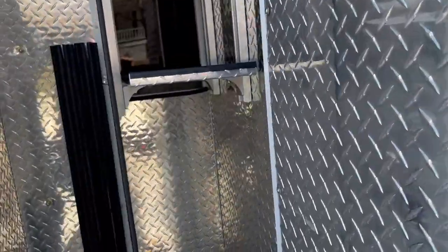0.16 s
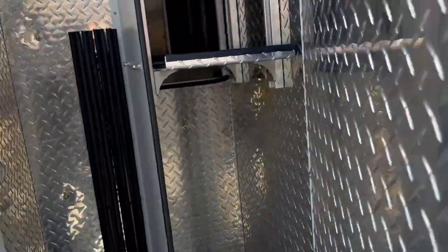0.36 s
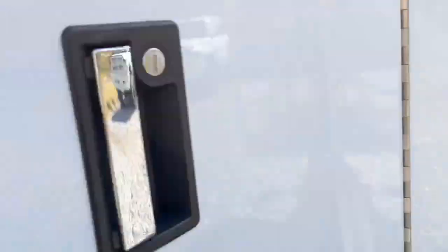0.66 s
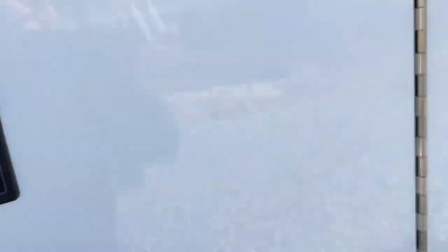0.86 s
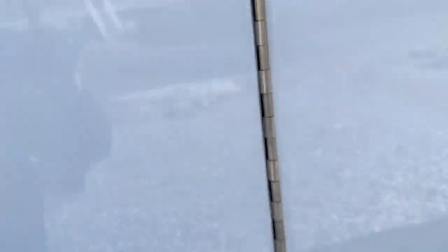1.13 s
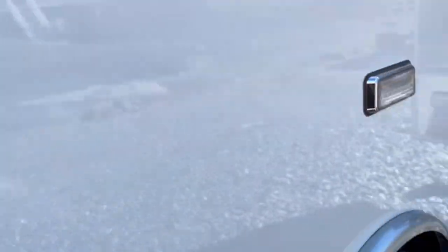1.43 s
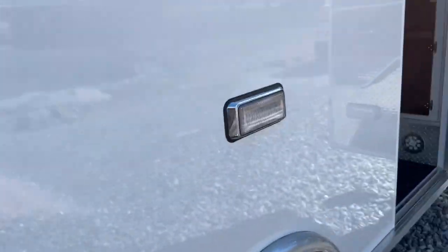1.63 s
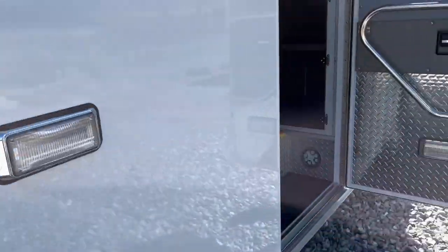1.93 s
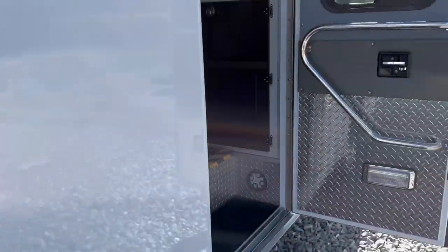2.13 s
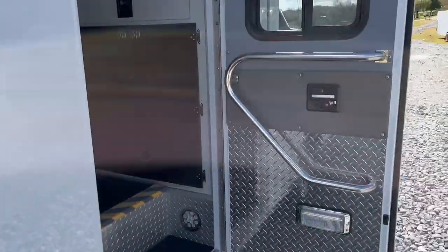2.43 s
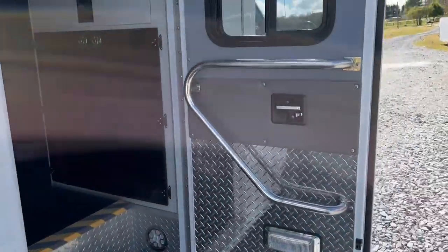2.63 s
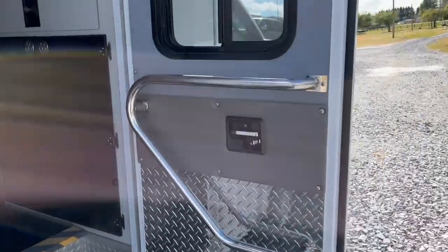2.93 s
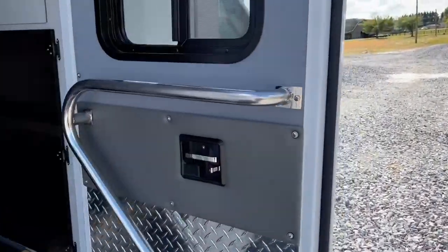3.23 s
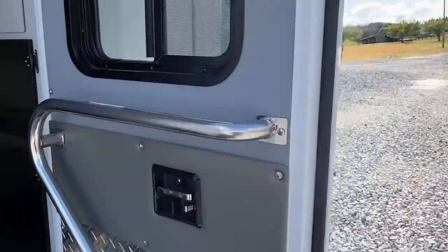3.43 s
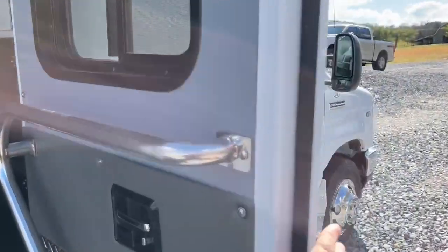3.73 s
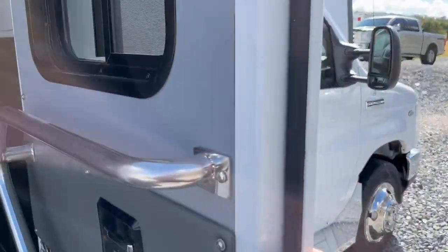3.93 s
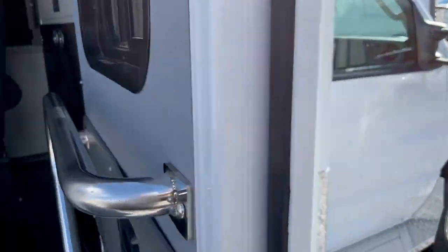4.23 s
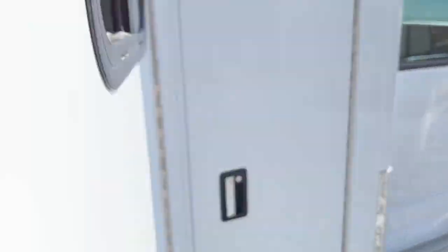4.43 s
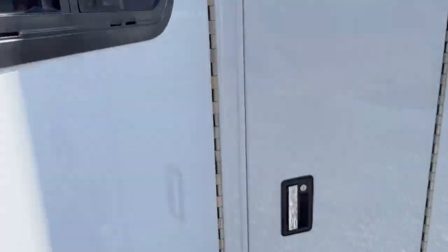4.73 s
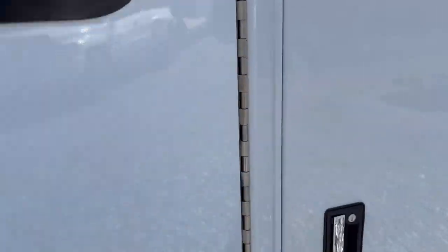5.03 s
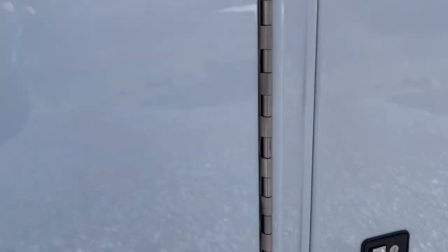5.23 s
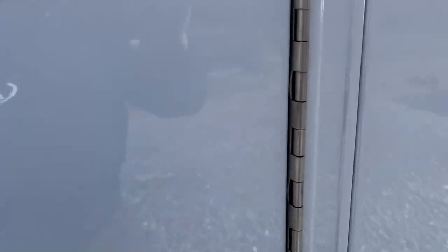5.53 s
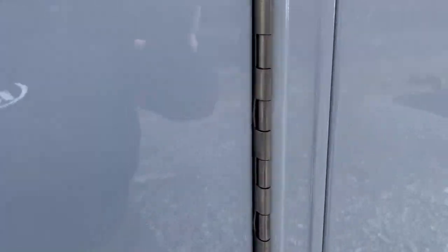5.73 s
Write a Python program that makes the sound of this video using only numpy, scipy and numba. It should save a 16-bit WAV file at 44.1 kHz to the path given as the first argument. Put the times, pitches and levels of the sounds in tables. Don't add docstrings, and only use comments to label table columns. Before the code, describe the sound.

Close stereo phone pickup in open air, with a quiet hush of far traffic. Light gravel scuffs lead to a seal creak and a loud, deep metal door slam just before one second. Uneven footsteps grind and crack pebbles, hardest near two seconds. After a quieter walk, latch parts tick and rattle, then another panel door slams, its low boom dying quickly.

```python
import sys
import numpy as np
from scipy import signal
from scipy.fft import rfft, irfft, next_fast_len
from scipy.io import wavfile
from scipy.ndimage import uniform_filter1d
from numba import njit

SR = 44100
rng = np.random.default_rng(int(sys.argv[2]) if len(sys.argv) > 2 else 0)


def level_to_linear(level):
    exponent = np.asarray(level, float) / 20
    return 10 ** exponent


def store_pcm(level_fs):
    pcm = np.round(np.clip(level_fs, -1, 1) * 32767).astype(np.int16)
    wavfile.write(sys.argv[1], SR, np.atleast_2d(pcm).T)


N = 258426

# frequency_hz, density_db (per Hz)
STONES = [(120, -11.5), (200, -3.5), (617, -3), (934, -0.5), (2170, -4.5), (3950, -3.5), (5980, -4.5),
          (8050, -0.5), (10500, -7.5), (13000, -27), (15700, -31.5), (16200, -73)]


def unit(x):
    return x / np.sqrt(np.mean(x ** 2))


def gain_of_table(table, size):
    hz, db = np.transpose(table)
    return level_to_linear(np.interp(np.log(np.fft.rfftfreq(size, 1 / SR) + 1), np.log(hz + 1), db))


def colour(x, table):
    size = next_fast_len(len(x))
    return irfft(rfft(x, size) * gain_of_table(table, size), size)[:len(x)]


def band(x, lo_hz, hi_hz):
    return signal.sosfilt(signal.butter(2, [lo_hz, min(hi_hz, .45 * SR)], "band", fs=SR, output="sos"), x)


@njit
def svf(x, hz, share):
    y, b, l = np.empty(len(x)), 0., 0.
    for i in range(len(x)):
        g = np.tan(np.pi * hz[i] / SR)
        v = (b + g * (x[i] - l)) / (1 + g * (g + share))
        b, l, y[i] = 2 * v - b, l + 2 * g * v, share * v
    return y


def decay(t, t60):
    return np.exp(-t * np.log(1000) / t60)


def pressed(table, attack_s):
    s, hold, db, t60 = np.transpose(table)[:4, :, None]
    t = np.arange(N * 1000 // SR + 2) / 1000 - s
    return db + 40 * np.minimum(t / attack_s, 0) - 60 * np.maximum(t - hold, 0) / t60


def total(db):
    gain = np.sqrt(np.sum(level_to_linear(db) ** 2, axis=0))
    return np.interp(np.arange(N) * 1000 / SR, np.arange(db.shape[1]), gain)


def slips(per_s, spread_db, fade_s):
    chance = rng.random((2, N))
    size_db = np.minimum(-spread_db * np.log(chance[1] + 1e-9), 14)
    sizes = (chance[0] < per_s / SR) * level_to_linear(size_db)
    return unit(signal.lfilter([1], [1, -np.exp(-1 / (fade_s * SR))], sizes) + .02)


def bits(table, attack_s):
    out, t = np.zeros((2, N + 8192)), np.arange(8192) / SR
    for s, db, hz, share, t60 in table:
        edge = 1 + np.clip(share, .05, 1.5)
        ring = rng.standard_normal((2, len(t)))
        for _ in range(2):
            ring = band(ring, hz / edge, hz * edge)
        fade = (1 - np.exp(-t / attack_s)) * decay(t, np.clip(t60, .006, .2))
        i = int(s * SR) - 10
        out[:, i:i + len(t)] += level_to_linear(db - 1.5) * fade * unit(ring)
    return out[:, :N]


def ticks(rows, broad, rise_s, dull_top_hz):
    out, t = np.zeros((2, N + 4096)), np.arange(4096) / SR
    for s, db, hz, dull_db, t60 in rows:
        noise = rng.standard_normal((3, len(t)))
        wide = broad(noise[:2], hz)
        ring = unit(band(band(noise[:2], .62 * hz, 1.6 * hz), .62 * hz, 1.6 * hz))
        knock = unit(band(noise[1:], 280, dull_top_hz)) * level_to_linear(dull_db)
        fade = (1 - np.exp(-t / rise_s)) * decay(t, np.clip(t60, .008, .15))
        fade = fade * unit(level_to_linear(3. * unit(band(noise[2], 100, 500))))
        i = int(s * SR) - 20
        out[:, i:i + len(t)] += level_to_linear(db - 6.5) * fade * (1.316 * wide + 1.195 * ring + knock)
    return out[:, :N]


def gravel():
    # start_s, hold_s, level_db, release_t60_s, darkness_db
    steps = [(0., 0.0051, -47, 0.085, 5), (0.078, 0.036, -61.5, 0.88, 13), (.225, 0.041, -42, 0.15, 2),
             (0.28, 0.11, -52, 0.75, 6), (0.5, 0.23, -62.5, 0.32, 9.5), (0.664, 0.2, -56, 0.41, 4),
             (1.271, 0.043, -42.5, 0.26, 3.5), (1.367, 0.061, -44, 0.077, -0.5),
             (1.468, 0.0095, -38.5, 0.37, -6.5), (1.593, 0.29, -67, .3, 8), (1.805, 0.053, -56, 0.22, 7.5),
             (2.136, 0.059, -59, 0.34, 0.5), (2.18, 0.068, -56.5, 0.13, 5),
             (2.265, 0.088, -64.5, 0.54, 10.5), (2.491, 0.019, -46.5, 0.26, 5),
             (2.533, 0.053, -37.5, 0.32, -3.5), (3.295, 0.28, -72.5, .4, 1), (4.597, 0.05, -69.5, .3, 8.5),
             (3.65, 0.0063, -33, 0.11, -6.5), (3.663, 0.036, -42.5, 0.27, 1.5),
             (3.731, 0.042, -41.5, 0.071, -1.5), (3.797, 0.039, -45.5, 0.42, -0.5),
             (3.999, 0.032, -39, 0.27, 0), (4.02, 0.045, -49.5, 0.18, 10), (4.083, 0.18, -58, 0.99, 4),
             (4.345, 0.08, -58, 1, 4.5), (5.096, 0.46, -56, 0.24, 5), (5.593, 0.22, -72, 0.29, 17.5)]
    # start_s, hold_s, level_db, release_t60_s, darkness_db
    stomps = [
        (1.84, 0.087, -31, 0.44, -4),
        (1.97, 0.055, -28, 0.18, -1.5),
        (3.036, 0.068, -37.5, 0.39, 0.5),
    ]
    # start_s, hold_s, level_db, release_t60_s, darkness_db
    rattles = [
        (0.802, 0.086, -47.5, 0.26, 9.5),
        (0.874, 0.094, -34.5, 0.059, 5.5),
        (0.915, 0.033, -50.5, 0.57, 15),
        (4.692, .01, -51, .2, 7),
        (4.711, 0.024, -32, 0.31, -5),
        (4.847, 0.025, -43.5, 0.53, 0),
        (4.986, 0.041, -46, 0.2, 0.5),
        (5.401, 0.016, -37.5, 0.108, 0.5),
        (5.418, 0.0072, -23.5, 0.13, 2.5),
        (5.451, 0.027, -38, 0.24, 12),
    ]
    # time_s, gain_db
    facing = [
        (0., 3),
        (1.5, 3),
        (2.202, 0),
        (3.2, -8.5),
        (3.9, -6.5),
        (4.3, -3),
        (5.86, 6.5),
    ]
    weight_db = np.vstack([pressed(steps, attack_s=0.028), pressed(stomps + rattles, attack_s=0.00234)])
    skin_db = np.repeat([0, 1], [len(steps + stomps), len(rattles)])[:, None]
    facing_db = np.interp(np.arange(weight_db.shape[1]) / 1000, *np.transpose(facing))
    dark = np.array(steps + stomps + rattles)[:, -1:]
    thud_db = -1 + skin_db + 1.48 * dark
    dull_db = 2 + 0.79 * dark
    bright_db = -7 + facing_db
    stone_colour = [(80, -20.5), (140, -3.5)] + STONES[1:]
    grit = np.array([colour(v, stone_colour) for v in rng.standard_normal((2, N))])
    common = slips(450., spread_db=-1.0, fade_s=0.0074)
    out = 0
    # low_hz, high_hz, level_db, slip_fade_s
    for lo, hi, db, fade_s in [(111.5, 641, thud_db, 0.011), (480, 2030, dull_db, 0.0018),
                               (1500, 4290, 0.39, 0.00021), (7000, 24000, bright_db, 0.00013)]:
        rain = 0.14 + common + 0.56 * slips(700., 4.2, fade_s)
        out = out + total(weight_db + db) * unit(band(grit, lo, hi) * rain)
    return out


def air():
    # frequency_hz, density_db
    hush_colour = [(25, -2.5), (53, 5.5), (80, 7.5), (179, -7), (506, -21), (1620, -23), (2030, -30.5),
                   (3730, -28.5), (6500, -37.5), (7750, -38.5), (10500, -38), (13000, -62), (15700, -52.5),
                   (16200, -92)]
    k = int(SR / 4.)
    swell = uniform_filter1d(np.repeat(rng.standard_normal((2, N // k + 1)), k, axis=1), k)[:, :N]
    hush = level_to_linear(-49) * unit(np.array([colour(v, hush_colour) for v in rng.standard_normal((2, N))]))
    return band(hush, 45, 2500) * level_to_linear(2. * swell[0]) + band(hush, 500, 19000) * level_to_linear(2.5 * swell[1])


def stone_ticks():
    # start_s, peak_db, ring_hz, t60_s
    snaps = [(.2365, -29, 4700, 0.096), (.7068, -38, 3500, 0.094), (1.2005, -20, 1640, 0.011),
             (1.273, -29.5, 4230, 0.1), (1.4521, -24, 8200, 0.022), (1.482, -15, 5260, 0.037),
             (1.5703, -40.5, 3200, 0.066), (1.619, -31.5, 3930, 0.017), (1.6553, -41.5, 4070, 0.027),
             (1.8425, -10.5, 3730, 0.022), (1.8606, -18, 4070, 0.16), (1.922, -3, 4400, 0.022),
             (2.1056, -26.5, 6800, 0.025), (2.2946, -27, 1670, 0.029), (2.343, -27, 2590, 0.044),
             (3.041, -17.5, 3710, 0.054), (3.1153, -18.5, 3100, 0.022), (3.2374, -33.5, 2500, 0.031),
             (3.3468, -51.5, 3800, 0.039), (3.7535, -30, 4200, 0.025), (3.9916, -22, 2850, 0.017),
             (4.0094, -23, 2770, 0.054), (4.3303, -32.5, 2770, 0.014), (4.3893, -38.5, 4060, 0.09),
             (4.566, -31.5, 2540, 0.02), (5.1265, -25.5, 1560, 0.056), (5.2105, -28, 2020, 0.019),
             (5.2516, -33, 1650, 0.018)]
    # start_s, peak_db, ring_hz, t60_s
    knocks = [(.1132, -45, 3630, 0.043), (.1447, -32, 1500, 0.073), (.2284, -54, 4350, 0.025),
              (.6885, -39.5, 1900, 0.064), (1.364, -29.5, 2230, 0.029), (1.4022, -33.5, 7660, 0.052),
              (1.7318, -42.5, 2720, 0.063), (1.9719, -36, 4400, 0.2), (2.2317, -41.5, 2800, 0.084),
              (2.4393, -41.5, 1660, 0.12), (2.4909, -39, 3660, 0.023), (2.531, -33, 3200, 0.067),
              (2.5407, -23.5, 2670, 0.043), (2.5815, -28, 2720, 0.085), (3.032, -20.5, 2360, 0.018),
              (3.2012, -40, 3930, 0.023), (3.2974, -35.5, 1500, 0.037), (3.6387, -19.5, 2670, 0.0086),
              (4.4478, -44.5, 2700, 0.14), (5.181, -23.5, 1630, 0.024), (5.3648, -33, 3330, 0.035),
              (5.563, -34, 2090, 0.021), (5.6467, -44.5, 1930, 0.036), (5.7578, -44, 1570, 0.051)]

    def broad(noise, hz):
        wide = np.array([unit(band(colour(v, STONES), 860, 28.0 * hz)) for v in noise])
        return unit(band(band(wide, 300, 3.3 * hz), 1200, 2.39 * hz))

    rows = [(s, db, hz, dull_db, t60) for table, dull_db in ((snaps, -12), (knocks, 5))
            for s, db, hz, t60 in table]
    return ticks(rows, broad, rise_s=.0025, dull_top_hz=1200)


def boom():
    # start_s, hold_s, level_db, release_t60_s, centre_hz
    thumps = [(0.121, 0.037, -27.5, 0.98, 56.8), (0.654, 0.25, -40, 0.28, 65.5),
              (0.906, 0.065, -10, .3, 59.7), (0.99, 0.15, -18.5, 0.34, 67.2),
              (1.251, 0.026, -27.5, 0.16, 60.5), (1.334, 0.0092, -23.5, 0.13, 63),
              (1.475, 0.014, -24, 0.24, 54), (1.707, 0.032, -40, 0.64, 60.5),
              (1.86, 0.045, -33.5, 0.2, 68.8), (1.931, 0.0086, -26, 0.1, 69), (2.085, 0.013, -40, .8, 70),
              (2.409, 0.22, -41, 0.36, 60.2), (2.574, 0.018, -39.5, 0.27, 72.5),
              (3.083, 0.15, -64, 0.78, 68.7), (3.253, 0.11, -47, 0.4, 74),
              (4.003, 0.078, -38.5, 0.37, 67.7), (4.151, 0.02, -41.5, 0.79, 73.2),
              (4.35, 0.28, -52.5, .4, 59.7), (4.674, 0.034, -33.5, 0.76, 55.7),
              (4.819, 0.032, -36.5, 0.83, 65.6), (4.936, 0.088, -29, 0.25, 68), (5.11, 0.019, -36, 1, 51.7),
              (5.264, 0.025, -34.5, 0.77, 56.7), (5.447, 0.018, -14.5, 0.33, 73),
              (5.584, 0.052, -21.5, 0.44, 66.7), (5.681, 0.022, -21.5, 0.2, 81),
              (5.745, 0.17, -27.5, .9, 61)]
    level_db = np.maximum(pressed(thumps, attack_s=0.0072), -200)
    level = total(level_db)
    centre_db = 20 * np.log10(np.array(thumps)[:, -1:])
    hz = np.clip(total(level_db + centre_db) / level, 40, 100)
    shake = rng.standard_normal((2, N))
    ring = svf(svf(shake[0], hz, .15), hz, .35)
    ring = unit(ring / np.sqrt(uniform_filter1d(ring ** 2, 4000) + 1e-9))
    broad = unit(band(shake[1], 40.0, 125))
    rest = level_to_linear(-71)
    return (level + rest) * unit(ring + broad / 1.65)


def creaks():
    # start_s, peak_db, centre_hz, width_share, t60_s
    hollow = [(.146, -32, 1710, 0.31, 0.045), (.802, -29, 686, 0.11, 0.084), (.826, -22.5, 360, 0.21, 0.16),
              (.83, -26, 637, .15, 0.044), (.85, -19.5, 400, 0.24, 0.061), (.868, -18, 480, 0.18, .05),
              (4.02, -35, 513, 0.72, 0.14), (4.866, -31, 543, 0.4, 0.033), (5.445, -14.5, 282, 0.46, 0.24),
              (5.495, -10, 300, 0.52, 0.035), (5.604, -37.5, 2010, 0.11, 0.035)]
    return bits(hollow, attack_s=0.0023)


def pebbles():
    # start_s, peak_db, centre_hz, width_share, t60_s
    rolling = [(.175, -49, 4500, .3, .02), (.51, -48, 4500, 0.48, .03), (.78, -44, 3700, 0.52, 0.094),
               (1.292, -26, 5960, 0.79, 0.018), (1.385, -34, 890, 0.34, 0.18),
               (1.42, -32, 4500, 0.68, 0.022), (1.695, -48, 4570, 0.15, 0.018),
               (1.773, -47, 1500, 0.98, 0.026), (2.177, -51, 3290, .4, .04),
               (2.199, -42, 2690, 0.32, 0.037), (2.302, -34.5, 2370, 0.37, 0.023),
               (2.42, -45.5, 2000, .7, 0.037), (3.051, -18, 3750, 0.23, 0.022),
               (3.1694, -41, 1780, 0.86, 0.026), (3.3196, -43, 2020, 0.84, 0.074),
               (3.6415, -26, 3480, 0.98, 0.04), (3.665, -32.5, 4500, 1, .03),
               (3.676, -28, 3280, 0.45, 0.028), (3.693, -31, 1500, 0.8, .02), (3.768, -45, 5000, .9, 0.014),
               (4.46, -39, 3440, 0.53, 0.032), (4.488, -42, 1970, 1, 0.048),
               (4.503, -47, 2490, 0.69, 0.029), (4.592, -43.5, 2020, 1, 0.029),
               (4.615, -44.5, 1300, 0.41, 0.055), (4.645, -47.5, 3000, 0.85, 0.017),
               (5.15, -36, 3500, 0.8, 0.048), (1.8428, -15.5, 4970, 1, 0.015), (1.876, -30, 4200, 0.8, .03),
               (1.889, -26, 4000, 0.54, .02), (1.909, -24, 4500, .7, .03), (1.995, -20, 4220, 0.34, 0.036),
               (2.009, -21, 4300, 0.45, 0.032), (2.028, -22.5, 4240, 0.75, 0.054),
               (2.043, -27.5, 3960, 0.73, 0.043), (3.031, -29, 2430, .8, 0.023),
               (2.44, -41, 730, 0.23, 0.044), (2.232, -42.5, 636, 0.23, 0.081)]
    return bits(rolling, attack_s=0.00042)


def clicks():
    # start_s, peak_db, centre_hz, width_share, t60_s
    loose = [(.6255, -47, 8700, 0.47, 0.013), (.8091, -38, 6000, 0.62, .02),
             (.8815, -18, 12860, 0.288, 0.03), (.9025, -11, 12900, 0.387, 0.0307),
             (.9125, -25.5, 9170, .7, .012), (.918, -14, 12700, .3, 0.02), (.9348, -22, 11360, 0.61, 0.022),
             (.941, -29, 9020, 0.63, 0.016), (.954, -30, 7550, .7, .025), (.9688, -23, 10340, 0.39, 0.015),
             (1.0057, -44.5, 13500, .3, .015), (1.0396, -38, 5000, .6, .015),
             (1.0665, -45.5, 14500, .2, .015), (1.0925, -35, 5970, 0.79, 0.01),
             (1.103, -50, 6430, .8, 0.014), (1.972, -20, 4600, 0.97, 0.025),
             (2.1062, -43.5, 14060, .3, .012), (2.238, -46.5, 7900, 0.26, 0.042),
             (2.398, -52, 3000, 0.47, .02), (2.4915, -28.5, 3860, 0.24, 0.03),
             (4.7082, -34, 8920, 0.74, 0.016), (4.7336, -31, 15730, .1, 0.017),
             (4.7445, -30, 6000, 0.42, 0.024), (4.776, -38, 5000, .8, 0.012),
             (4.8334, -35, 10000, 0.23, 0.012), (4.845, -51, 9400, 0.37, 0.013),
             (4.8888, -45, 15900, .1, .015), (4.945, -49, 5000, .7, 0.013),
             (5.0155, -32, 14300, 0.34, 0.018), (5.1816, -29, 5170, 0.53, 0.017),
             (5.2121, -28, 5600, 0.52, .02), (5.2769, -39, 14100, .3, .012)]
    return bits(loose, attack_s=.0005)


def slam(blows, panel):
    out, t = np.zeros(N + SR), np.arange(SR) / SR
    for s, db, contact_ms in blows:
        weights = rng.uniform(.7, 1.3, len(panel))
        detune = rng.uniform(.94, 1.06, len(panel))
        ring = 0
        for weight, shift, (hz, mode_db, t60) in zip(weights, detune, panel):
            mode_hz = hz * (shift if hz > 100 else 1)
            ring = ring + weight * level_to_linear(mode_db) * decay(t, t60) * np.sin(2 * np.pi * mode_hz * t)
        push = np.hanning(int(contact_ms * SR / 1000) + 3)
        i = int(s * SR)
        out[i:i + SR] += level_to_linear(db) * np.convolve(ring, push / push.sum())[:SR]
    return out[:N]


def door_slams():
    # start_s, strength_db, contact_ms
    small_blows = [
        (.803, -37, 0.4),
        (.83, -54, 0.77),
        (.882, -6, 2.2),
        (.897, 5, 3.9),
        (.915, -16, 1),
        (.9435, 1, 4.9),
    ]
    side_blows = [
        (5.421, -25.5, 0.48),
        (5.437, -12, 4.3),
        (5.4465, -10, 3.37),
        (5.472, -29.5, 2.2),
        (5.494, -20.5, 3.2),
        (5.54, -26.5, 3.8),
    ]
    # frequency_hz, level_db, t60_s
    small_panel = [(61.82, -26, 1.75), (155.0, -12.0, 0.27), (218.4, -13.0, 0.45), (351, -19.0, 0.54),
                   (543.0, -13, 0.077), (589, -39.5, 0.71), (714, -30.5, 0.4), (730, -20, 0.38),
                   (954, -43.5, 0.68), (29.2, -9.0, 0.79), (39.4, -10.5, 0.17), (74.2, -18, 0.5),
                   (94.5, 2.0, 0.046)]
    side_panel = [(82.8, -1.0, 0.21), (248.3, -2.5, 0.2), (368, -5.0, 0.18), (428, 19.0, 0.03),
                  (533, -29.0, 0.063), (624, -36, 0.17), (700, -33, 0.28), (830, -26.5, 0.29),
                  (916, -45, 0.18), (38, -3.0, 0.12), (465, -21, 2.1), (63.0, -7.0, 0.097),
                  (124.0, 10.5, 0.051), (152.8, -13.0, 0.86)]
    return slam(small_blows, small_panel) + slam(side_blows, side_panel)


def latch():
    # start_s, peak_db, ring_hz, dull_db, t60_s
    parts = [(.8702, -31, 1500, 13, 0.058), (.882, 1.5, 3200, -33, 0.018), (.9027, 2, 3140, -46, 0.013),
             (.918, -2, 2860, -37, 0.015), (.9351, -18, 3960, -7, 0.032), (.9689, -16, 4800, -21, 0.014),
             (1.0063, -30, 8000, -22, 0.016), (1.039, -36, 8000, -9, 0.019), (1.066, -30, 7700, 2, 0.018),
             (1.127, -39.5, 6270, 12, 0.039), (4.7012, -35.5, 4170, -17, 0.048),
             (4.7137, -14, 1670, 2, 0.013), (4.7336, -8.5, 7240, -3.5, 0.023),
             (4.7618, -15.5, 7900, -9, 0.031), (4.8, -17.5, 4800, -33, 0.02),
             (4.8187, -28, 3570, -12, 0.016), (4.8645, -23, 4330, 2, 0.048),
             (4.8893, -8, 5800, -22, 0.0066), (4.9034, -14, 4120, -21.5, 0.0064),
             (1.053, -44, 7600, -15.5, 0.015), (5.0144, -12.5, 6720, -12.5, 0.016),
             (5.2764, -29, 8000, -25, 0.012), (5.4205, 0.5, 4900, -16, 0.016),
             (5.4328, -6, 3540, -30, 0.029)]
    # frequency_hz, density_db (per Hz)
    metal = [(710, -67), (1200, -5), (3060, -7.5), (4680, -3), (6370, -14), (7370, -7), (10500, -19.5),
             (13000, -33), (16000, -37.5), (16800, -59.5)]

    def broad(noise, hz):
        return np.array([unit(band(colour(v, metal), 860, 17000)) for v in noise])

    return ticks(parts, broad, rise_s=.0011, dull_top_hz=850)


def whomps():
    # start_s, peak_db, start_hz, end_hz, fall_s
    sweeps = [
        (.913, -8.5, 620, 67.6, 0.0048),
        (.9445, -1.5, 40, 64, .01),
        (5.4346, -4.5, 1035, 104, 0.00345),
        (5.434, -2.5, 98, 79.2, 0.015),
    ]
    out, t = np.zeros(N + 4096), np.arange(4096) / SR
    for s, db, start_hz, end_hz, fall_s in sweeps:
        hz = end_hz + (start_hz - end_hz) * np.exp(-t / fall_s)
        i = int(s * SR)
        out[i:i + len(t)] += level_to_linear(db) * np.sin(2 * np.pi * np.cumsum(hz) / SR) * np.exp(-t / .028)
    return out[:N]


def flank_echo(x):
    t = np.arange(4096) / SR
    scatter = rng.standard_normal(len(t)) * np.exp(-t / 0.013) * (t > .002) * level_to_linear(-32.5)
    return signal.fftconvolve(band(x, 383, 8200), scatter)[:N]


def two_ports(bed, sharp):
    # frequency_hz, gain_db
    mid_gain = [(900, -2), (1450, -5), (2100, -2), (5500, -2), (6400, -10), (7200, -1), (11200, -4.5),
                (11900, -14), (13600, -30), (14200, -4.5), (15100, 3.5), (15800, -21)]
    # frequency_hz, gain_db
    ports = [(25, -28), (60, -20), (350, -10), (800, -5), (1400, 1), (1750, -1), (2200, -22), (3000, -6),
             (6200, 0), (7600, 1), (8300, -35), (10000, -39), (10800, -1), (14300, 2), (15300, -24.5)]
    # frequency_hz, gain_db
    lean_db = [(100, -1), (300, 0), (700, 2), (1400, -.7), (2800, 3), (5500, 1), (7000, 0)]
    size = next_fast_len(N)
    mid, side = 0, 0
    for (like, unlike), depth in ((rfft(bed, size), 1), (rfft(sharp, size), .6)):
        mid = mid + like * gain_of_table(mid_gain, size) ** depth
        side = side + (.8j * like + .6 * unlike) * gain_of_table(ports, size) ** np.sqrt(depth)
    lean = np.sqrt(gain_of_table(lean_db, size))
    return irfft(np.array([(mid + side) * lean, (mid - side) / lean]), size)[:, :N]


def scene():
    bed = gravel() + air()
    sharp = stone_ticks() + latch()
    doors = door_slams() + whomps()
    echo = flank_echo(sharp[0] + bed[0] + doors)
    bed = bed + np.array([doors + boom() + echo, np.roll(band(doors, 300, 3000) + echo, 300)])
    sharp = sharp + creaks() + pebbles() + clicks()
    return two_ports(bed, sharp)


def roll_off(x):
    return signal.sosfilt(signal.butter(12, 16660, fs=SR, output="sos"), x)


def record(dry):
    firm = signal.sosfilt(signal.butter(2, 32, "high", fs=SR, output="sos"), dry)
    rounded = np.tanh(1.15 * firm) / 1.15
    soft = signal.sosfilt(signal.ellip(8, .2, 70, 16250, fs=SR, output="sos"), rounded)
    return roll_off(soft)


dry = scene()
out = record(dry)
store_pcm(out)
```